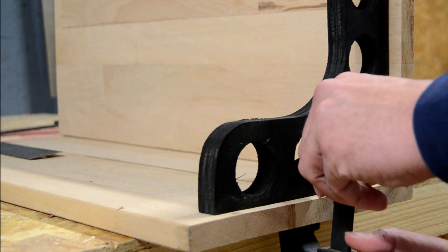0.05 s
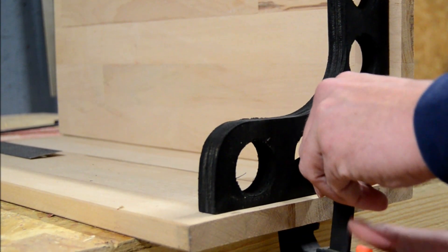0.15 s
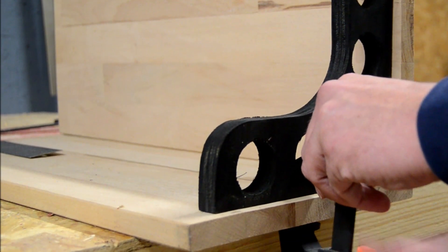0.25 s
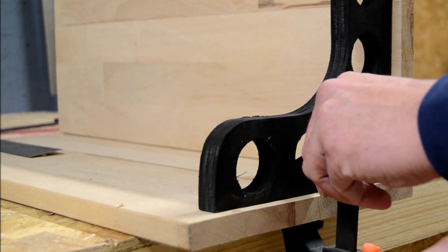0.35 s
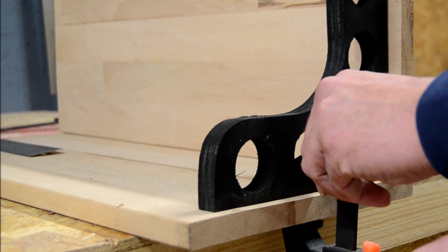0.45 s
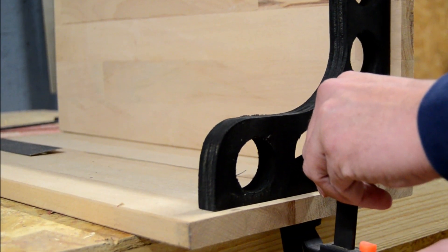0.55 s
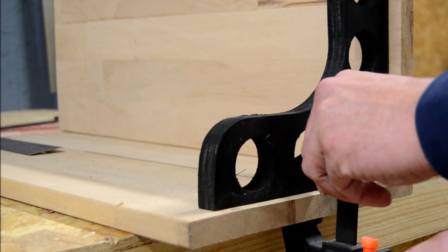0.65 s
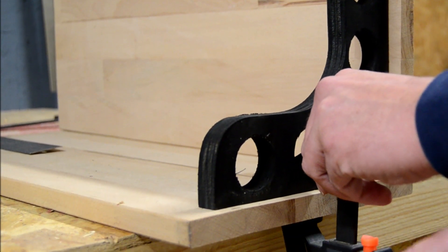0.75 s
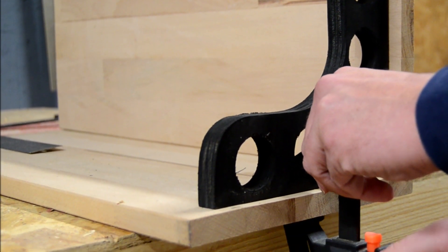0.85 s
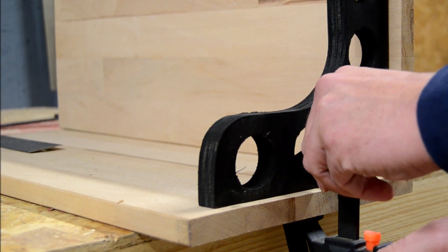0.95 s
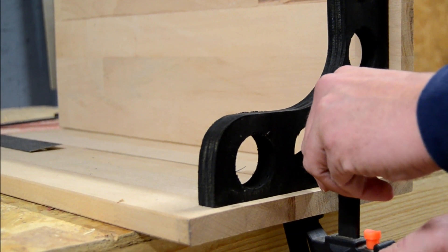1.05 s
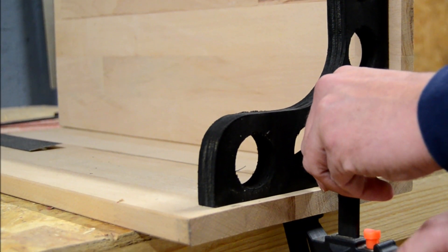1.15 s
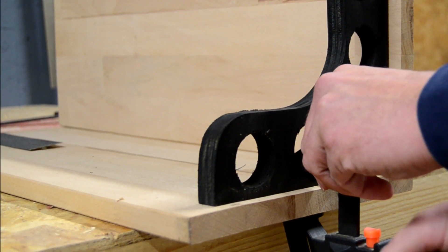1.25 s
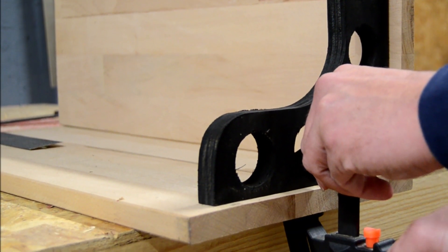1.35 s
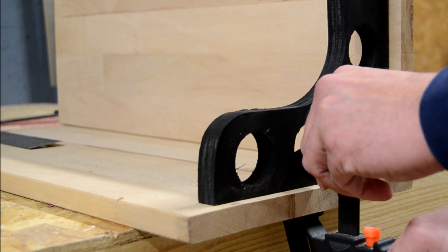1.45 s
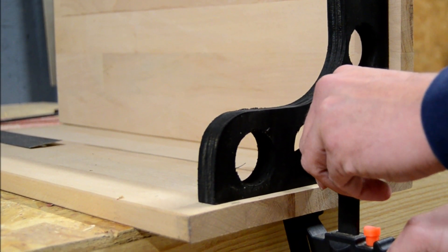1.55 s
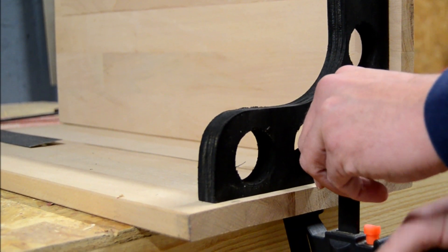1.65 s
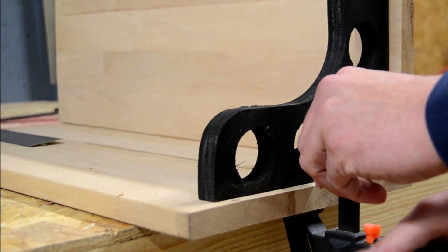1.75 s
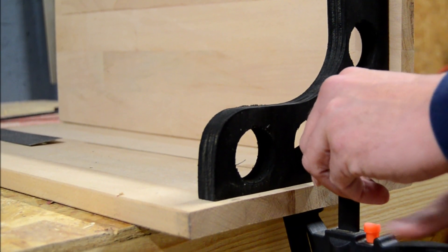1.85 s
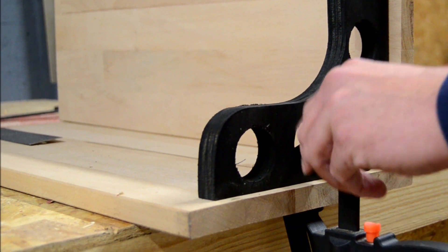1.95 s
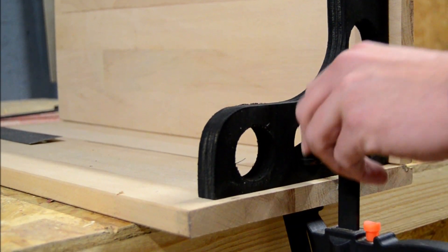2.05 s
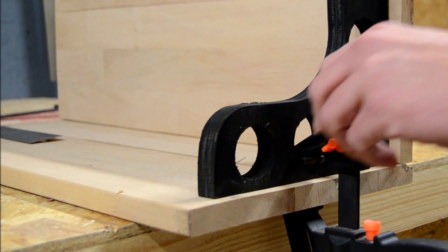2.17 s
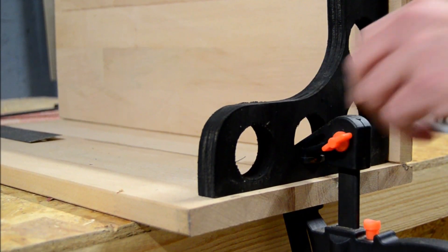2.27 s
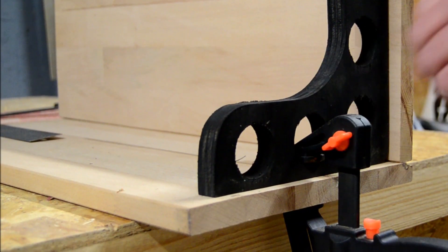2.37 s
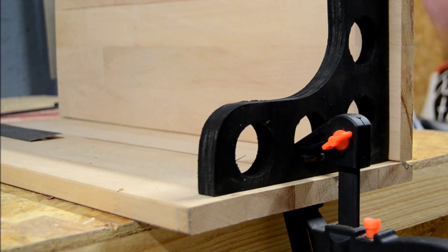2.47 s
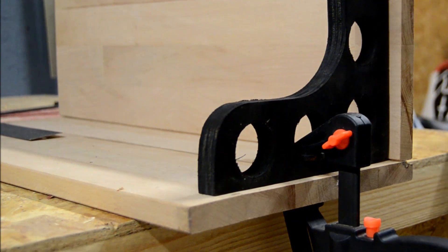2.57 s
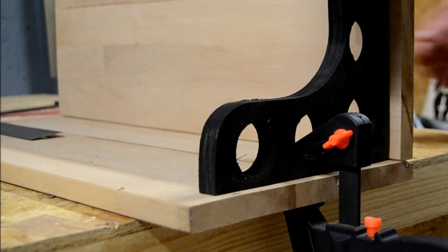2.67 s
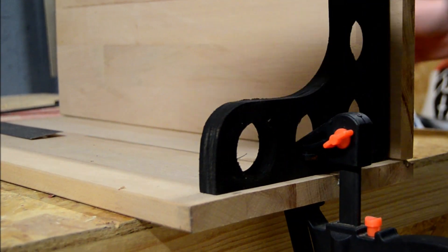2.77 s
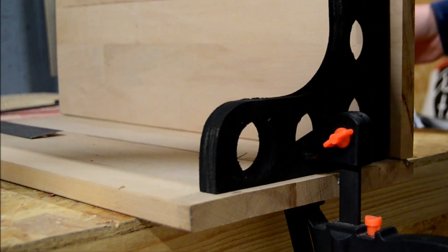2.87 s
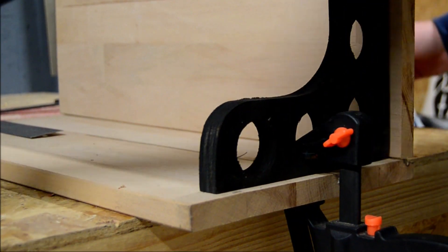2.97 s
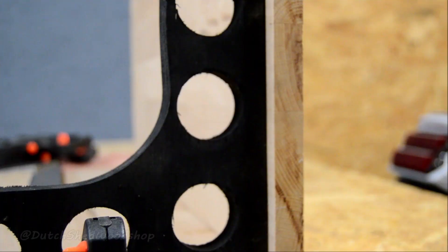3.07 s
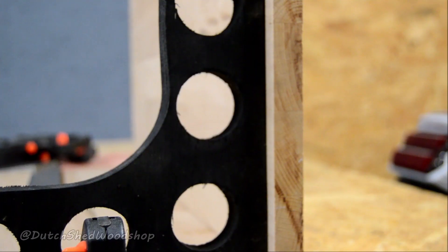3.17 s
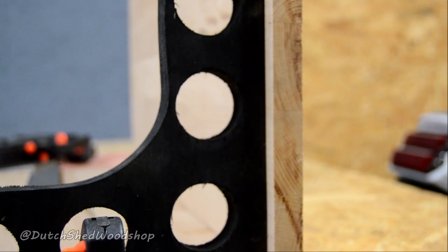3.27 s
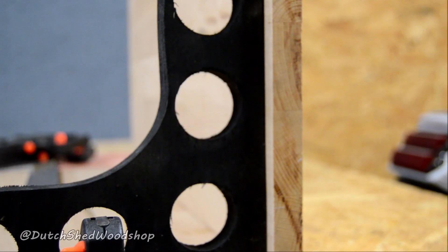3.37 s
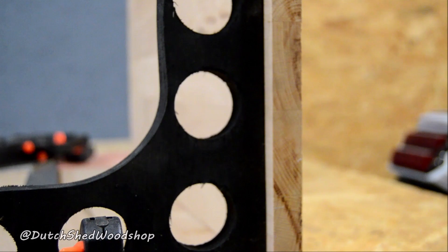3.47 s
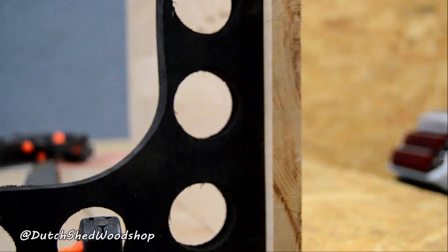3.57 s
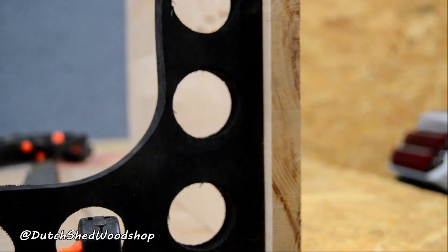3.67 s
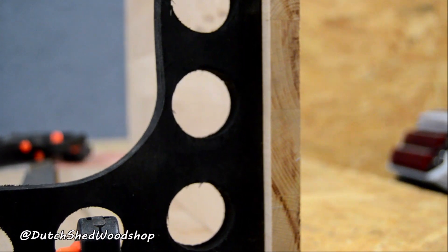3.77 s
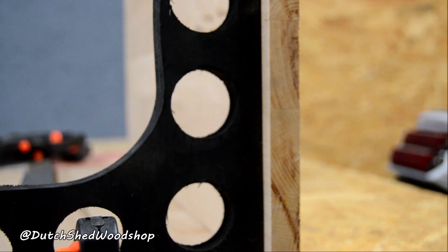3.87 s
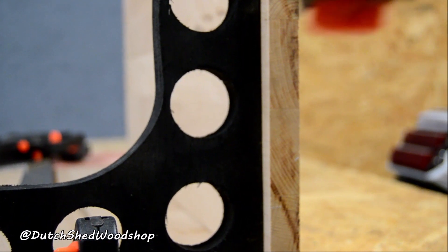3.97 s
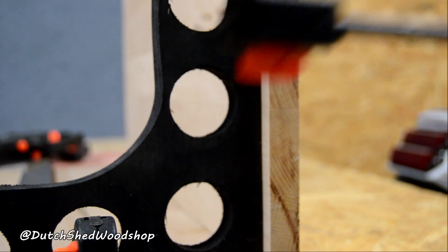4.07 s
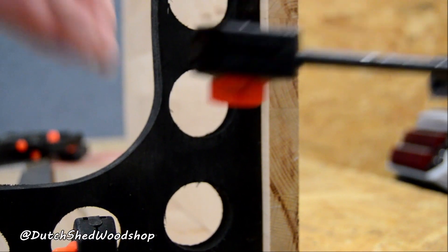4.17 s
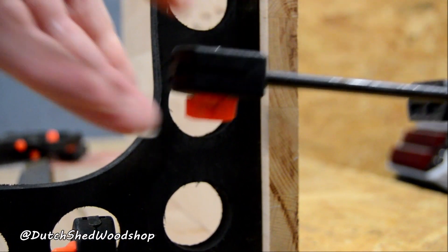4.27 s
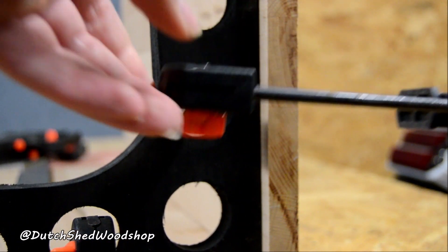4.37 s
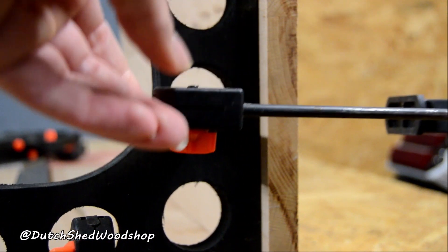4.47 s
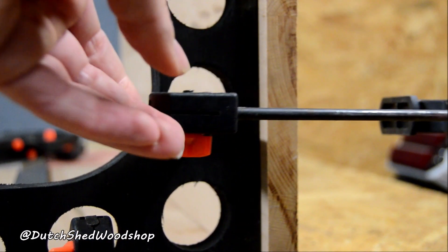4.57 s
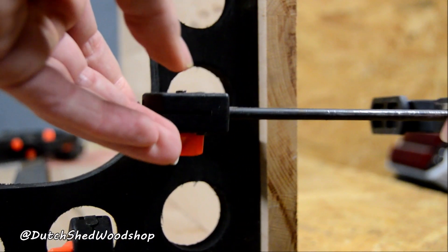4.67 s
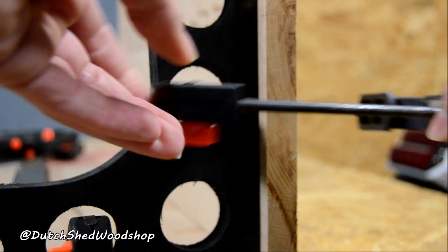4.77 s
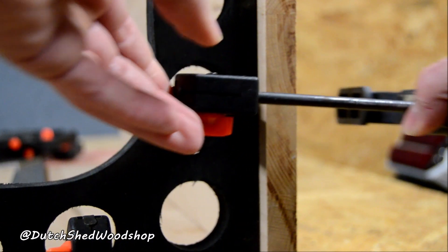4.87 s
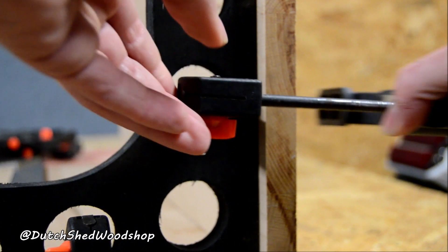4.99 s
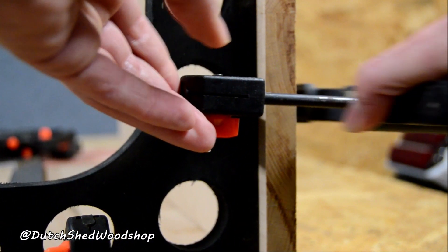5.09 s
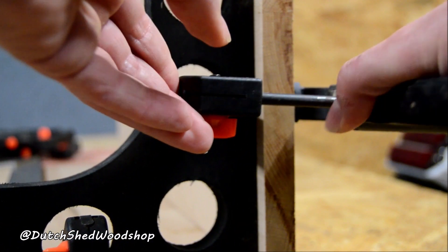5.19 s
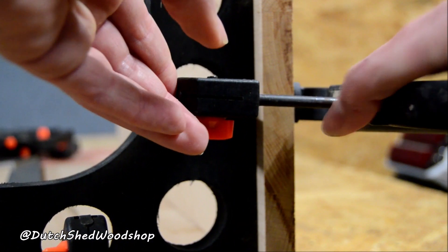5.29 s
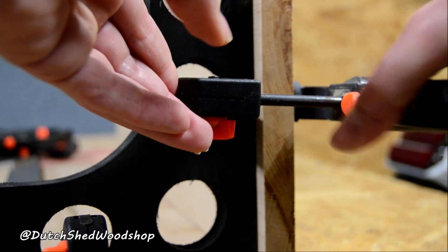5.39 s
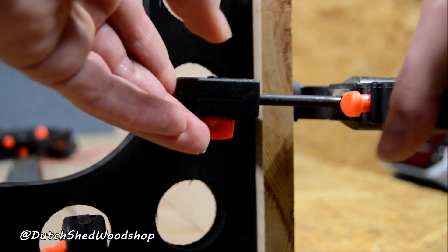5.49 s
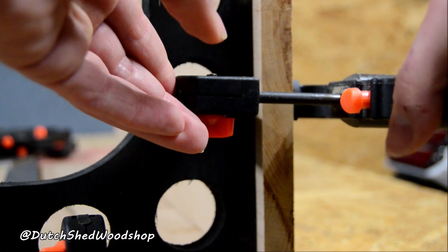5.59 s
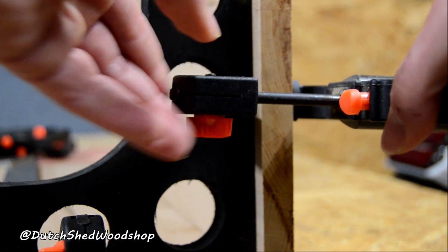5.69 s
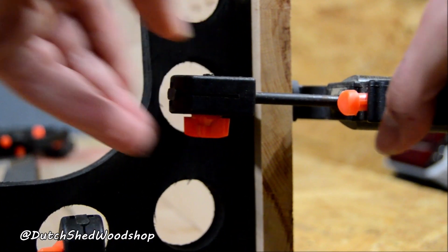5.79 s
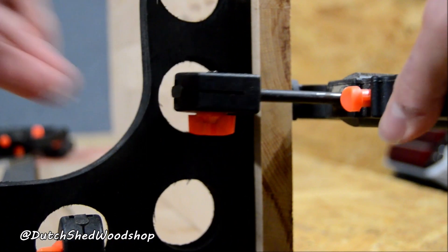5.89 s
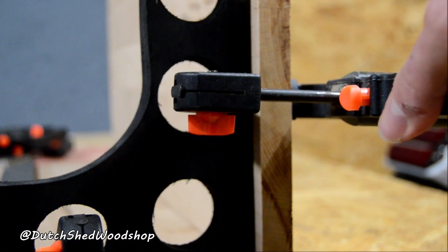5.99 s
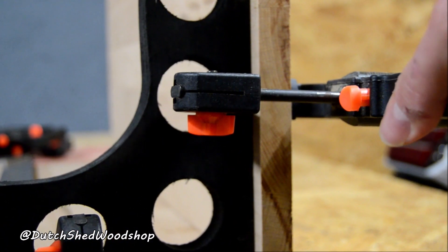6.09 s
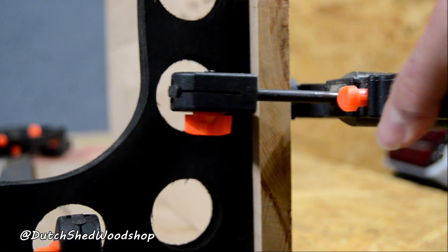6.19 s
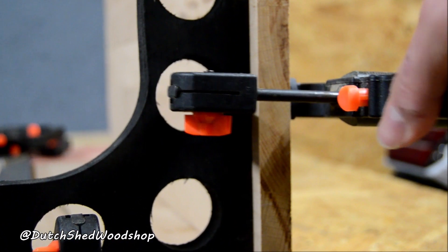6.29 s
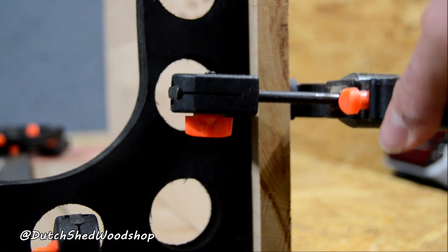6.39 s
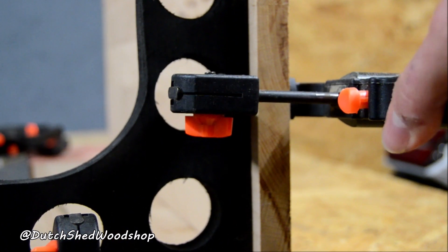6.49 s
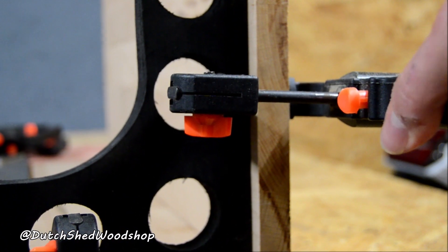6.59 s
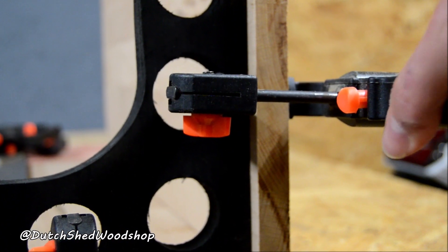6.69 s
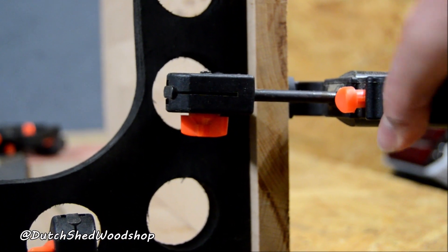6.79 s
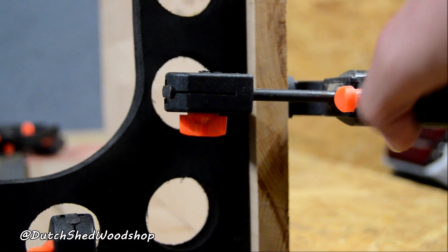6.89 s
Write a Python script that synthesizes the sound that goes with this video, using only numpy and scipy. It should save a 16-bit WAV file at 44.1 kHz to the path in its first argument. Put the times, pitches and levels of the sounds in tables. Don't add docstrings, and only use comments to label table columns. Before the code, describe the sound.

Close in a small, slightly echoing wood workshop, trigger clamps are tightened. Uneven hollow knocks and crisp plastic clicks come first, followed by soft handling. One brief stick-slip zip of a jaw along steel sounds, then near silence. Another jaw scrapes twice along its bar, rising into a loud woody clack, and smaller snaps, thuds and a double click finish it. Faint lamp hum and air lie underneath.

```python
import sys
import numpy as np
from scipy import signal
from scipy.fft import rfft, irfft, next_fast_len
from scipy.io import wavfile
from scipy.ndimage import map_coordinates

SR = 44100
rng = np.random.default_rng(int(sys.argv[2]) if len(sys.argv) > 2 else 0)


def to_wav(s):
    ch = np.atleast_2d(s).T
    pcm = np.round(np.clip(ch, -1, 1) * 32767)
    wavfile.write(sys.argv[1], SR, pcm.astype(np.int16))


def boost(x):
    u = np.asarray(x, float) / 20
    return 10 ** u


N = 306054
SPAN = SR * 2 // 5
BLOW_SPAN = SPAN // 8
SECOND_PIECE_S = 3

# (frequency [Hz], level [dB per Hz])
AIR_DB = [(25, -11), (33, -24), (45, -5), (70, -9.5), (100, -5), (140, -12), (200, -10.5), (400, -9.5),
          (800, -11.5), (2000, -16), (3200, -25), (5000, -32.5), (8000, -38), (12000, -39.5), (15500, -45)]
# (frequency [Hz], level [dB rms])
HUM_DB = [(98, -83), (199.2, -83.5), (296.1, -86)]
# (frequency [Hz], T60 [s])
SHOP_T60_S = [(100, 0.63), (260, 0.31), (700, 0.36), (1840, 0.33), (4850, 0.33), (12000, 0.17)]

# (time [s], peak [dB], pitch [Hz])
BENCH_THUDS = [(0.59, -39, 223), (0.778, -50.5, 215), (0.952, -48.5, 222), (1.132, -54, 207),
               (1.337, -47, 189), (1.36, -45, 198), (1.409, -48.5, 194), (1.667, -50.5, 215),
               (2.574, -50, 207), (2.645, -56.5, 173), (3.55, -51.5, 134), (3.56, -57, 175),
               (4.971, -54.5, 202), (5.157, -53, 190), (5.291, -46.5, 174), (5.32, -64, 171),
               (5.751, -63.5, 213), (5.885, -47, 185), (5.921, -42, 236), (6.334, -58, 179),
               (6.72, -60, 188), (6.759, -63, 105)]
# (time [s], peak [dB], pitch [Hz])
LEG_RUMBLES = [(0.799, -72, 39.4), (1.399, -71, 41.8), (4.999, -85, 51.6), (5.299, -61, 40.5),
               (5.919, -65, 44.6), (6.359, -66, 50.6)]
# (time [s], peak [dB], pitch [Hz])
TOP_SWAYS = [(0.61, -63.5, 104), (1.157, -65.5, 124), (1.379, -60, 93), (1.449, -59.5, 110),
             (1.692, -60.5, 110), (2.699, -78, 104), (5.011, -61, 117), (6.379, -59.5, 85)]

# (peak time [s], rub [dB], rise [s], fall [s], skin hiss re rub [dB])
HAND_STROKES = [(1.97, -81, 0.053, 0.16, -20), (2.154, -64.5, 0.13, 0.071, -18),
                (2.49, -82, 0.94, 0.032, -28), (2.56, -64.5, 0.062, 0.26, -24),
                (2.808, -70, 0.3, 0.91, -17.5), (3.116, -71.5, 0.034, 0.038, -27),
                (3.64, -76, 0.058, 0.11, -8), (4.564, -81, 0.018, .016, -35), (4.7, -71, 0.034, .01, -20),
                (5.58, -77.5, 0.82, 0.017, -13), (5.634, -90, .006, 0.44, -40),
                (5.72, -78.5, 0.12, 0.33, -15), (5.834, -77, 0.013, 0.11, -48),
                (6.74, -91, 0.073, 0.033, -28), (6.759, -60, 0.012, 0.017, -28),
                (6.83, -70, 0.48, 0.22, -28), (4.25, -80, 0.46, 0.55, -18), (0.3, -80, 0.33, 0.48, -13)]
# (frequency [Hz], level [dB])
RUB_DB = [(150, -3.5), (500, -7), (1000, 0.5), (2000, -2), (3500, -14.5), (6000, -29), (12000, -38.5)]
# (frequency [Hz], level [dB])
SKIN_DB = [(2500, -26), (5000, -10.5), (9000, -4), (13000, -9), (15500, -3.5)]

# (time [s], peak [dB], pitch [Hz])
SPRING_PINGS = [(0.7756, -62, 4750), (0.7756, -69, 4730), (0.927, -66, 4700), (0.927, -81, 4770),
                (0.927, -74, 4420), (5.142, -60, 4630)]
# (time [s], peak [dB], pitch [Hz])
LINGERING_MODES = [(0.004, -39, 602), (0.004, -45, 796), (0.01, -41.5, 1028), (0.01, -50.5, 1227),
                   (0.18, -53, 318), (0.585, -42, 712), (0.585, -43, 998), (0.778, -43.5, 605),
                   (0.778, -50, 1100), (0.778, -54, 1990), (0.778, -47, 2394), (0.955, -56.5, 525),
                   (1.183, -48, 1014), (1.183, -48, 1680), (1.183, -48, 1980), (1.183, -64, 2330),
                   (1.183, -52, 2603), (5.143, -36, 626), (5.143, -31, 470), (5.143, -37.5, 1237),
                   (5.878, -49.5, 745), (5.878, -42, 329), (5.878, -56, 1190), (5.91, -54, 740),
                   (5.91, -56.5, 1660), (6.19, -61, 1177), (6.333, -40, 372.7), (6.333, -46, 853),
                   (6.333, -49, 1025), (6.36, -48, 1025), (6.36, -59, 372), (0.004, -65.5, 2550),
                   (1.657, -49, 323), (1.657, -54, 1077), (1.657, -62, 721), (1.72, -64, 1190),
                   (0.585, -48.5, 323), (0.585, -65.5, 2552), (1.336, -51.5, 554), (1.336, -61, 1098),
                   (0.97, -48.5, 325), (1.183, -47, 559), (5.18, -45, 528), (5.93, -50.5, 750),
                   (6.4, -61, 1012), (6.42, -57, 850), (0.07, -49, 1048), (0.004, -58.5, 3164),
                   (0.1, -53, 614), (5.15, -42, 829), (5.225, -51, 480), (0.585, -68, 2067),
                   (5.2, -42, 1240), (5.2, -51.5, 855), (0.778, -57, 2640)]
# (time [s], peak [dB], pitch [Hz])
PLASTIC_TICKS = [(2.549, -42, 1500), (2.571, -47, 689), (3.355, -41, 880), (3.888, -52, 834),
                 (4.561, -56, 900), (5.635, -40, 890), (5.908, -34, 730), (6.188, -36, 1290),
                 (6.758, -62, 1250)]
# (time [s], peak [dB], pitch [Hz])
PLASTIC_SNAPS = [(4.5, -60, 880), (4.9, -54, 1200), (5.6345, -47.5, 1710), (4.882, -37, 1300),
                 (3, -54, 800), (1.132, -60, 790), (1.1815, -38, 2700), (5.833, -41, 1100),
                 (3.7, -51, 1700), (5.909, -36, 2110), (6.188, -55, 2150), (6.297, -46, 1150),
                 (6.332, -58, 1900), (6.758, -53, 2000)]
# (time [s], peak [dB], pitch [Hz])
CATCH_CRACKS = [(3.3268, -28.5, 1410), (5.2735, -38, 2000), (5.6345, -38, 1640), (5.3705, -43, 540),
                (6.3325, -25, 920), (6.328, -36, 2100), (3.887, -55, 930), (3.1, -50, 1800),
                (2.4, -48, 780), (4.882, -35, 1000), (3.4445, -44, 1700)]
# (time [s], peak [dB], pitch [Hz])
CLICK_EDGES = [(0.7754, -65, 9700), (0.7851, -53.5, 8900), (1.1817, -53, 9100), (1.1954, -61, 8080),
               (1.3335, -46, 8800), (1.4745, -71, 8930), (1.6581, -59, 8080), (6.1864, -73, 9460),
               (6.327, -55, 9900)]
# (time [s], peak [dB], pitch [Hz])
FIRST_SWING = [(0.0012, -20.5, 542)]
# (time [s], peak [dB], pitch [Hz])
STEEL_GLINTS = [(5.2735, -72, 8600), (5.2735, -67, 10300), (5.143, -66.5, 9400), (4.882, -64, 8100)]

# (time [s], speed [dB], grip [dB])
SLIDE_CURVES = [
    [(3.34, -71, -66), (3.358, -59, -62.5), (3.412, -54.5, -53), (3.45, -51, -53), (3.476, -54.5, -46),
     (3.504, -60.5, -54), (3.535, -68, -59.5), (3.565, -91, -68), (3.6, -88, -85)],
    [(4.656, -90, -92), (4.67, -86, -67), (4.7, -68, -61), (4.778, -59, -63.5), (4.812, -59.5, -55.5),
     (4.864, -60, -68), (4.875, -59, -55)],
    [(4.875, -54.5, -55), (4.897, -54.5, -49.5), (4.927, -54.5, -54.5), (5.021, -55, -56),
     (5.071, -47.5, -46), (5.131, -60, -42.5), (5.14, -55, -48)],
]
# (time [s], surge [dB])
JAW_CATCHES = [(3.356, 11.5), (3.366, 9), (3.399, 4), (3.435, 0), (3.444, -1), (3.476, -5), (3.498, 1),
               (4.709, 4), (4.733, 9), (4.752, 7), (4.798, 4), (4.812, 2.5), (4.894, 8.5), (4.908, 4),
               (4.918, 4), (4.967, 7), (5.01, 5), (5.027, 5.5), (5.059, 6), (5.067, 3.5), (5.08, 1.5),
               (5.087, 4.5), (5.099, 6), (5.111, 6), (5.122, -3), (5.133, -1)]
# (time [s], load [dB])
PAD_DRAG = [(4.89, -86), (4.93, -59), (5.07, -57.5), (5.14, -55)]
# (time [s], loaded share [0-1])
JAW_LOADING = [(3.3, 0), (3.45, 0.07), (3.47, 0.96), (3.7, 0.7)]
# (time [s], level [dB])
FIRST_BAR_SQUEAL = [(3.345, -30), (3.36, -2), (3.378, -1), (3.395, -12), (3.42, 0), (3.445, 1), (3.465, -5),
                    (3.49, -15), (3.54, -23)]
# (time [s], level [dB])
BAR_SINGING = [(4.68, -1.5), (4.75, -2.5), (4.81, 2.5), (4.87, 1), (4.93, -0.5), (4.99, 0), (5.04, -2),
               (5.09, -3), (5.14, 0.5)]
# (time [s], far-place share [0-1])
BAR_TILT = [(4.7, .8), (4.8, .7), (4.83, .2), (4.9, .2), (4.96, .6), (5.0, .3), (5.035, .9), (5.07, .2),
            (5.14, .05)]

# (frequency [Hz], width [Hz], level [dB])
JAW_MODES = [(878, 230, 7), (1023, 108, 0.5), (1096, 170, 4)]
# (frequency [Hz], width [Hz], level [dB])
LOOSE_JAW_MODES = [(840, 120, 1), (950, 220, -2.5)]
# (frequency [Hz], width [Hz], level [dB])
LOADED_JAW_MODES = [(994, 100, 6), (1110, 200, -10)]
# (frequency [Hz], width [Hz], level [dB])
PLATE_MODES = [(1290, 100, -4), (1660, 220, 4.5), (1884, 115, 4), (2240, 900, -10.5)]
# (frequency [Hz], width [Hz], level [dB])
FIRST_PLATE_MODES = [(1330, 240, -2.5), (1630, 230, 2), (1900, 200, 4.5), (2200, 390, -4)]
# (frequency [Hz], width [Hz], level [dB])
GROAN_MODES = [(293, 31, -3.5), (476, 73, -10.5)]
# (frequency [Hz], width [Hz], level [dB])
BAR_MODES = [(2730, 370, 9), (3900, 730, 15.5), (3680, 80, 11.5), (4920, 440, -3), (5600, 450, -11),
             (6600, 360, 4), (7100, 250, -6), (8220, 170, 9), (8700, 270, 2.5), (9600, 900, -13),
             (12700, 900, -13)]
# (frequency [Hz], width [Hz], level [dB])
WAVERING_MODES = [(10400, 220, 1), (10750, 300, -2)]
# (frequency [Hz], width [Hz], level [dB])
FIRST_BAR_MODES = [(3070, 250, -3.5), (3800, 340, -1), (4230, 190, -7)]
# (frequency [Hz], width [Hz], level [dB])
FIRST_BAR_HIGH_MODES = [(5350, 900, 0), (8460, 170, 10), (11000, 740, -20)]
# (frequency [Hz], width [Hz], level [dB])
SHIFTING_MODES = [(5800, 280, -1), (6500, 250, -2)]

# (frequency [Hz], width [Hz], level [dB])
BOARD_MODES = [
    [(215, 95, -7), (333, 30, 7.5), (436, 64, -1.5), (503, 24.5, 2), (615, 82, 4), (720.3, 21.5, 6.5)],
    [(183, 42, 2), (301.5, 48, 0.5), (375, 25, 4), (470, 42, -1), (530, 21, -5), (613, 88, 0.5)],
]
# (frequency [Hz], width [Hz], level [dB])
CLAMP_MODES = [
    [(769, 91, -7.5), (953, 95, -8), (1052, 50, -3.5), (1161, 117, -7), (1343, 164, -8.5)],
    [(761, 25, 3.5), (853, 58, 4.5), (1130, 455, -4.5), (1176, 42, 4.5), (1290, 21, -8.5)],
]
# (frequency [Hz], width [Hz], level [dB])
TRIGGER_MODES = [
    [(1442, 110, -0.5), (1760, 200, -0.5), (2032, 190, 2.5), (2390, 360, -2), (2734, 336, -0.5),
     (3050, 1170, -9), (3515, 450, -9.5)],
    [(1560, 370, -10), (1780, 46, 0.5), (1750, 650, 7.5), (2400, 740, -5.5), (2900, 100, -31)],
]
# (frequency [Hz], level [dB])
TICK_DB = [(1500, -17), (3200, 3), (4700, -2), (7000, -12.5), (11000, -15.5), (15500, -28)]

# (time [s], clamp peak [dB], trigger share [dB], tick share [dB])
JAW_PRESSES = [(0.159, -51, 1, -17), (0.187, -56.5, 1, -28), (0.582, -30, -4.5, -36), (0.929, -40, 0, -20),
               (0.936, -46, -2, -32), (0.952, -40.5, -3, -32), (1.132, -52.5, -5, -27),
               (1.196, -34, 2, -13), (1.399, -43, -16, -31), (5.228, -41.5, -12, -40),
               (5.272, -42, 2.5, -40), (5.855, -50.5, -1, -50), (5.94, -53, -20, -44),
               (6.709, -58.5, 7, -35)]
# (time [s], clamp peak [dB], trigger share [dB], tick share [dB])
JAW_SEATS = [(0.241, -65.5, 9, -28), (0.507, -45.5, 1, -18), (0.776, -31.5, 5, -20.5),
             (1.333, -33, -1.5, -12), (1.475, -65.5, -31, -1.5), (1.635, -47.5, 6.5, -15),
             (1.652, -40, 6, -11), (1.658, -39, 5.5, -12), (2.152, -59, -2, -10.5), (2.76, -63.5, 9, -5),
             (2.786, -68.5, -12, 6.5), (5.1414, -19.5, -14, -41), (5.154, -28, -4, -56),
             (5.177, -51, -17, -42), (5.908, -35.5, -5.5, -49), (6.326, -36.5, 5, -16.5),
             (6.747, -54.5, -13, -24)]
# (time [s], clamp peak [dB], trigger share [dB], tick share [dB])
FREE_CLICKS = [(0.025, -29.5, -19, -44), (0.078, -42, -9, -40), (0.498, -57, 9.5, -9),
               (1.1808, -30.5, 8, -14.5), (2.355, -63.5, 10.5, -0.5), (2.537, -69, -7, 5),
               (3.118, -77, -7, -22), (4.687, -62, -8, -18), (4.882, -42.5, -7, -19), (6.179, -55, 13, -7),
               (6.187, -43, 6, -17.5), (6.296, -43, 5.5, -20)]
# (time [s], clamp peak [dB], trigger share [dB], tick share [dB])
HAND_TAPS = [(0.787, -35, 7, -17), (2.551, -63, 6, -32), (3.327, -41.5, -10, -55), (3.648, -48.5, -22, -25),
             (3.887, -60, -14, -29), (4.561, -50.5, -20, -32), (4.896, -54, -15, -24)]
# (time [s], clamp peak [dB], trigger share [dB], tick share [dB])
HAND_THUMPS = [(0.0, -21, -1.5, -25.5), (0.623, -40, -35, -45), (0.974, -47, -26, -31),
               (2.571, -48.5, 4, -21), (6.332, -30.5, 6, -30)]
# (time [s], clamp peak [dB], trigger share [dB], tick share [dB])
TRIGGER_SLACKS = [(5.371, -37.5, -10, -43), (5.635, -47, 3.5, -43), (5.833, -43.5, 0.5, -46),
                  (5.875, -33.5, -6, -34), (6.756, -52.5, 9.5, -28)]
# (board [dB], room [dB])
CONTACT_KINDS = [
    (4, 4),
    (-1.5, 6),
    (-11.5, 6),
    (-26, -4.5),
    (5, -0.5),
    (-8, 4),
]


def unit(x):
    return x / np.sqrt(np.mean(np.abs(x) ** 2) + 1e-20)


def peaked(x):
    return x / np.max(np.abs(x))


def along(points, hz):
    f, v = np.transpose(points)
    return np.interp(np.log(hz + 1), np.log(f + 1), v)


def curves(rows, off=None):
    s, *cols = np.transpose(rows)
    return [np.interp(np.arange(N) / SR, s, c, off, off) for c in cols]


def wobble(rate_hz):
    knots = rng.standard_normal(int(N * rate_hz / SR) + 4)
    return map_coordinates(knots, [np.arange(N) * rate_hz / SR])


def filtered(x, response):
    n = x.shape[-1]
    m = next_fast_len(n + SR // 2)
    return irfft(rfft(x, m) * response(np.fft.rfftfreq(m, 1 / SR)), m)[..., :n]


def coloured(points):
    return lambda f: boost(along(points, f))


def resonant(modes):
    def response(f):
        total = 0
        for k, (hz, width_hz, db) in enumerate(modes):
            damping = 1j * f * width_hz
            total = total + (-1) ** k * boost(db) * damping / (hz * hz - f * f + damping)
        return total
    return response


def moving(x, modes, share):
    low, high = (boost(mode[2]) * unit(filtered(x, resonant([mode]))) for mode in modes)
    return np.sqrt(1 - share) * low + np.sqrt(share) * high


def soft(top_hz):
    return lambda f: 1 / (1 + 1j * f / top_hz) ** 2


def small(f):
    return ((1j * f / 105) / (1 + 1j * f / 105)) ** 2


def struck(modes, top_hz):
    blow = 1. * (np.arange(BLOW_SPAN) == 0)
    padded = filtered(blow, lambda f: soft(top_hz)(f) ** 1.68)
    return peaked(filtered(padded, resonant(modes)))


def rings(table, attack_s, t60_s):
    out, t = np.zeros(N + SPAN), np.arange(SPAN) / SR
    for s, db, hz in table:
        envelope = boost(db + 4.5 - 60 * t / t60_s) * (1 - np.exp(-t / attack_s))
        out[round(s * SR):][:SPAN] += envelope * np.sin(2 * np.pi * hz * t)
    return out[:N]


def tail(rise_s):
    hz, t, z = signal.stft(rng.standard_normal(SPAN), SR, nperseg=256)
    decay = boost(-60 * t / along(SHOP_T60_S, hz)[:, None])
    sound = signal.istft(z * decay, SR, nperseg=256)[1][:SPAN]
    t = np.arange(SPAN) / SR
    sound = sound * (1 - np.exp(-t / rise_s))
    lumps = np.interp(t * 130, np.arange(64), rng.standard_normal(64))
    sound = sound * boost(1.34 * lumps)
    return sound / np.linalg.norm(sound)


def in_room(x, room_db, rise_s):
    return x + boost(room_db) * signal.fftconvolve(x, tail(rise_s))[:N]


def shop_air():
    air = unit(filtered(rng.standard_normal(N), coloured(AIR_DB)))
    t = np.arange(N) / SR
    waver_db = 2.5
    hum = sum(boost(db + 1.0 + waver_db * wobble(1.5)) * np.sin(2 * np.pi * hz * t) for hz, db in HUM_DB)
    hum = hum * np.where(t < SECOND_PIECE_S, 1, boost(-4.0))
    return boost(-71.5 + 0.9 * wobble(4.44)) * air + hum


def bench():
    thuds = rings(BENCH_THUDS, attack_s=0.0039, t60_s=0.099)
    rumbles = rings(LEG_RUMBLES, attack_s=0.016, t60_s=.36)
    sways = rings(TOP_SWAYS, attack_s=0.0019, t60_s=0.17)
    return (thuds + rumbles + sways) * boost(2.3 * wobble(55))


def hands():
    rub = unit(filtered(rng.standard_normal(N), coloured(RUB_DB))) * boost(2.5 * wobble(37))
    skin = unit(filtered(rng.standard_normal(N), coloured(SKIN_DB))) * boost(3.5 * wobble(45))
    t = np.arange(N) / SR
    out = np.zeros(N)
    for s, db, rise_s, fall_s, hiss_db in HAND_STROKES:
        stroke_db = -20 * np.maximum((s - t) / rise_s, (t - s) / fall_s)
        out += boost(db + stroke_db) * (rub + boost(hiss_db) * skin)
    return out


def trigger_spring():
    return in_room(rings(SPRING_PINGS, attack_s=0.0003, t60_s=0.022), room_db=-6, rise_s=0.0026)


def lingering_modes():
    modes = rings(LINGERING_MODES, attack_s=0.0034, t60_s=0.12) * boost(3.75 * wobble(70))
    return in_room(modes, room_db=-4.0, rise_s=0.0053)


def snaps():
    ticks = boost(-12.5) * rings(PLASTIC_TICKS, attack_s=0.0001, t60_s=0.013)
    plastic = rings(PLASTIC_SNAPS, attack_s=0.00047, t60_s=0.012)
    plastic = filtered(plastic, lambda f: soft(top_hz=3000)(f) ** 2)
    cracks = rings(CATCH_CRACKS, attack_s=0.00058, t60_s=0.0054)
    cracks = filtered(cracks, lambda f: soft(top_hz=2600)(f) ** 2 * small(f / 4))
    edges = boost(-3) * rings(CLICK_EDGES, attack_s=0.0001, t60_s=0.003)
    swing = rings(FIRST_SWING, attack_s=0.0004, t60_s=0.011)
    glints = rings(STEEL_GLINTS, attack_s=0.0003, t60_s=0.0097)
    return ticks + plastic + cracks + edges + swing + glints


def slides():
    grains = np.clip(rng.standard_normal(N), -2, 2) * (rng.random(N) < .09)
    t = np.arange(N) / SR
    surge_decay_s = 0.0059
    surges = np.zeros(N)
    for s, db in JAW_CATCHES:
        surges += (boost(db) - 1) * np.exp(-np.clip(t - s, 0, 1) / surge_decay_s) * (t >= s)
    clumps = boost(np.clip(1.7 * wobble(70) + 1.2 * wobble(250), -12, 5)) * (0.96 + 1.07 * surges)
    dull = filtered(grains * clumps, soft(top_hz=2450))
    bright = filtered(grains * clumps ** 0.2, soft(top_hz=11300))

    def body(modes):
        return unit(filtered(dull, resonant(modes)))

    jaw, plates, board = body(JAW_MODES), body(PLATE_MODES), body(GROAN_MODES)
    first_plates = body(FIRST_PLATE_MODES)
    loaded = curves(JAW_LOADING)[0]
    first_jaw = (1 - loaded) * body(LOOSE_JAW_MODES) + loaded * body(LOADED_JAW_MODES)

    bar = unit(filtered(bright, resonant(BAR_MODES)))
    bar = bar + boost(-19) * moving(grains * clumps ** .4, WAVERING_MODES, curves(BAR_TILT)[0])
    bar = bar * boost(curves(BAR_SINGING)[0] + 1.4 * wobble(40))

    first_low = unit(filtered(grains * clumps ** 0.5, resonant(FIRST_BAR_MODES)))
    first_high = unit(filtered(grains * clumps ** 0.36, resonant(FIRST_BAR_HIGH_MODES)))
    first_bar = boost(curves(FIRST_BAR_SQUEAL)[0]) * first_low + boost(-20) * first_high
    first_bar = first_bar + boost(-14.5) * moving(grains * clumps ** 0.33, SHIFTING_MODES, loaded)

    rasp = filtered(grains * clumps ** 0.21,
                    lambda f: soft(top_hz=6000)(f) ** 1.7 * (1j * f / (3000 + 1j * f)) ** 2)
    rasp = unit(rasp)

    out = boost(curves(PAD_DRAG, off=-150)[0]) * board
    first, second = (first_bar, first_jaw, first_plates), (bar, jaw, plates)
    steel_dbs, rasp_dbs = [-64, -65, -69], [-69.5, -68, -77]
    for rows, parts, steel_db, rasp_db in zip(SLIDE_CURVES, [first, second, second], steel_dbs, rasp_dbs):
        steel, slide_jaw, slide_plates = parts
        speed_db, grip_db = curves(rows, off=-150)
        faster_db = speed_db + 59
        out = out + boost(grip_db) * (slide_jaw + boost(-22.0) * board) + boost(speed_db) * slide_plates
        out = out + boost(steel_db + 0.97 * faster_db) * steel
        out = out + boost(rasp_db + 1.28 * faster_db) * rasp
    return in_room(boost(-3.5) * out, room_db=-8.0, rise_s=0.0039)


def knocks():
    out = np.zeros(N + SR + SPAN)
    lead_s = 0.001635
    second_room_db = -1
    boards = [struck(modes, top_hz=1140) for modes in BOARD_MODES]
    clamps = [struck(modes, top_hz=2130) for modes in CLAMP_MODES]
    triggers = [struck(TRIGGER_MODES[0], top_hz=4420), struck(TRIGGER_MODES[1], top_hz=2550)]
    t = np.arange(BLOW_SPAN) / SR
    snap = peaked(filtered(1. * (np.arange(BLOW_SPAN) == 40), coloured(TICK_DB)))
    tick_envelope = boost(-60 * t / 0.0077) * (1 - np.exp(-t / 0.002))

    tables = [JAW_PRESSES, JAW_SEATS, FREE_CLICKS, HAND_TAPS, HAND_THUMPS, TRIGGER_SLACKS]
    contacts = sorted((*row, *kind) for rows, kind in zip(tables, CONTACT_KINDS) for row in rows)
    for k, (s, db, trigger_db, tick_db, board_db, room_db) in enumerate(contacts):
        piece = int(s > SECOND_PIECE_S)
        tick = peaked(filtered(rng.standard_normal(BLOW_SPAN) * tick_envelope, coloured(TICK_DB)))
        body = boost(board_db) * boards[piece] + clamps[piece] + boost(trigger_db) * triggers[piece]
        body = boost(db - 7.5) * body
        echo = signal.fftconvolve(body + boost(db + tick_db + 5) * snap, tail(rise_s=0.00053))[:SPAN]
        start = SR + round((s - lead_s * (k == 0)) * SR)
        out[start:][:BLOW_SPAN] += body + boost(db + tick_db + 2.0) * tick
        out[start:][:SPAN] += boost(room_db + second_room_db * piece) * echo
    return out[SR:SR + N]


def scene():
    background = shop_air() + bench() + hands()
    details = trigger_spring() + lingering_modes() + snaps()
    clamping = filtered(slides() + knocks(), small)
    return (background + details + clamping)[None]


def top_cut(x):
    return signal.sosfilt(signal.butter(12, 15700, fs=SR, output="sos"), x)


def record(dry):
    return top_cut(dry)


dry = scene()
out = record(dry)
to_wav(out)
```